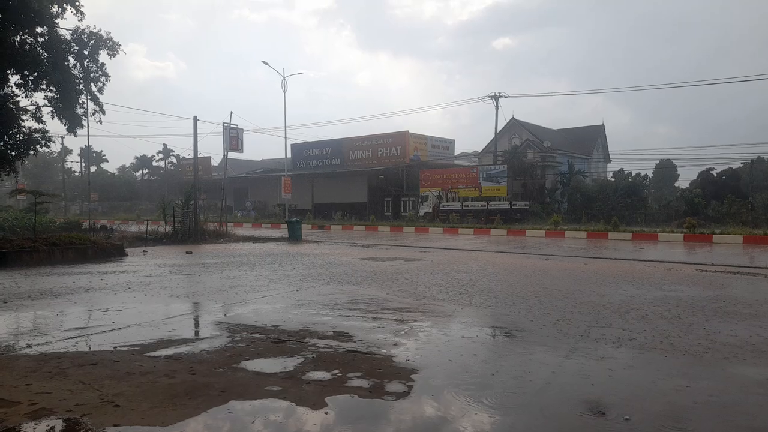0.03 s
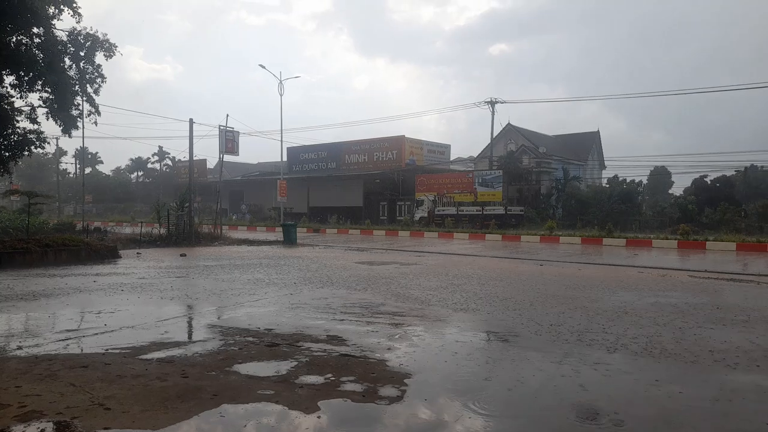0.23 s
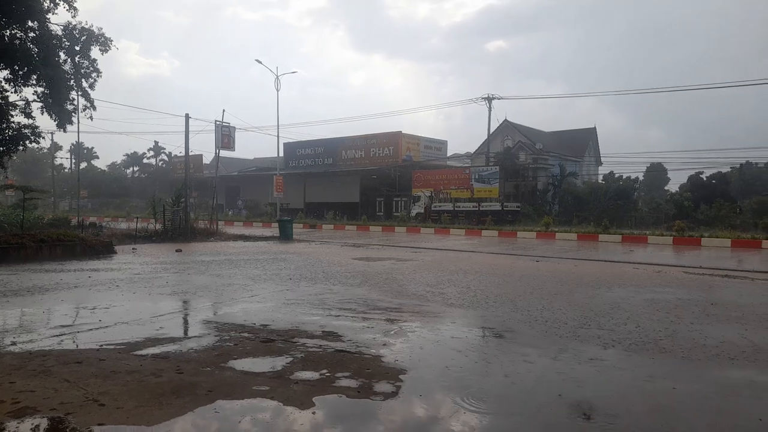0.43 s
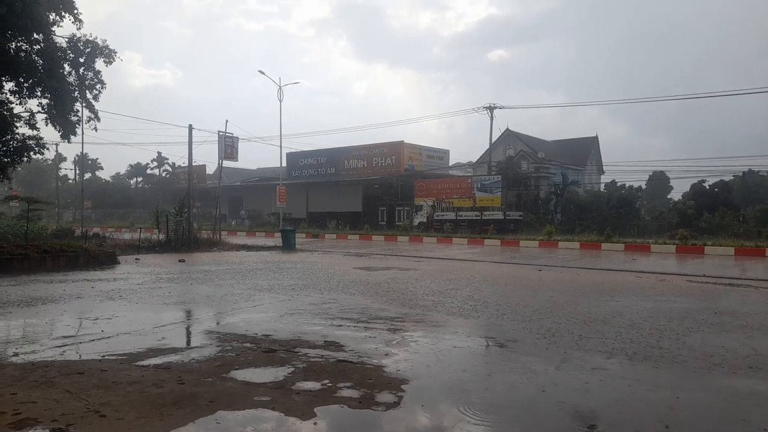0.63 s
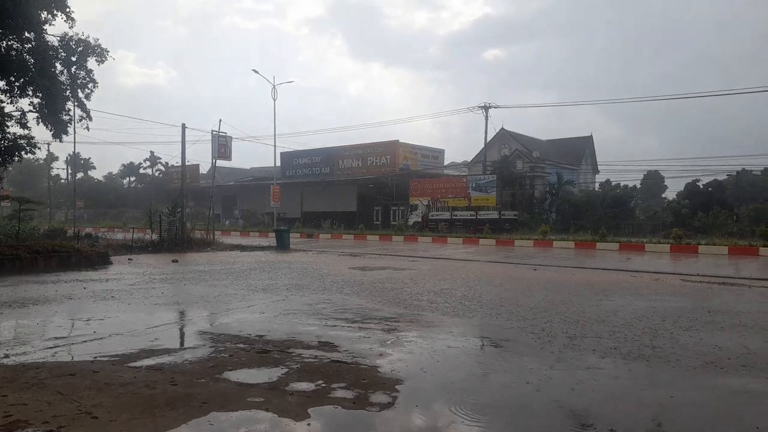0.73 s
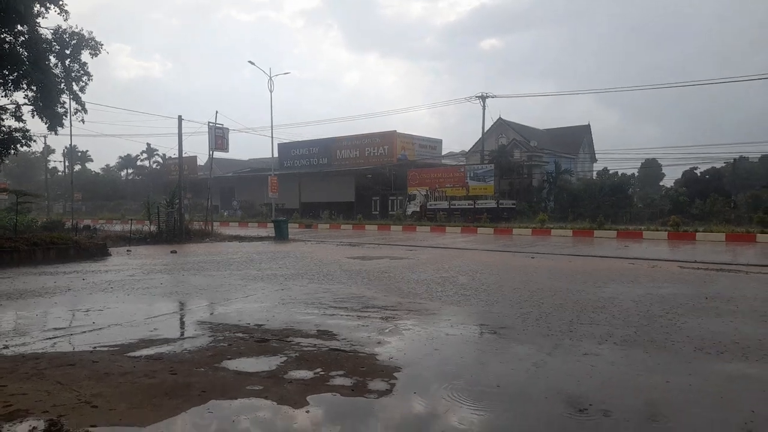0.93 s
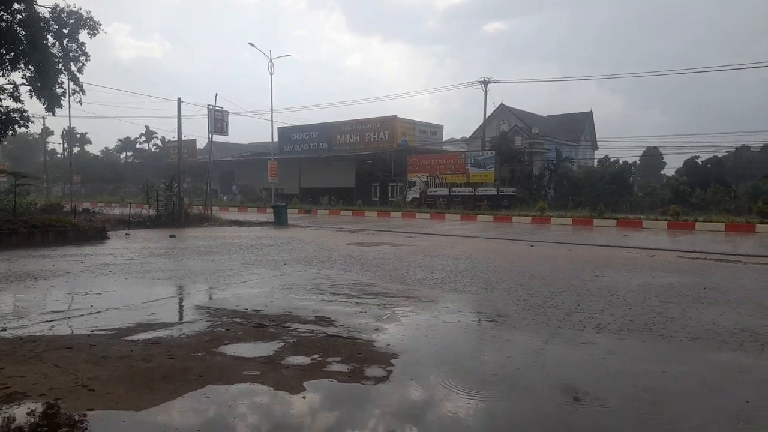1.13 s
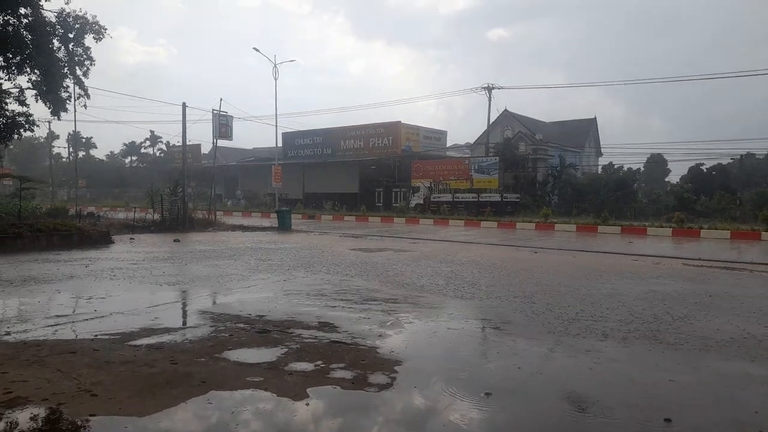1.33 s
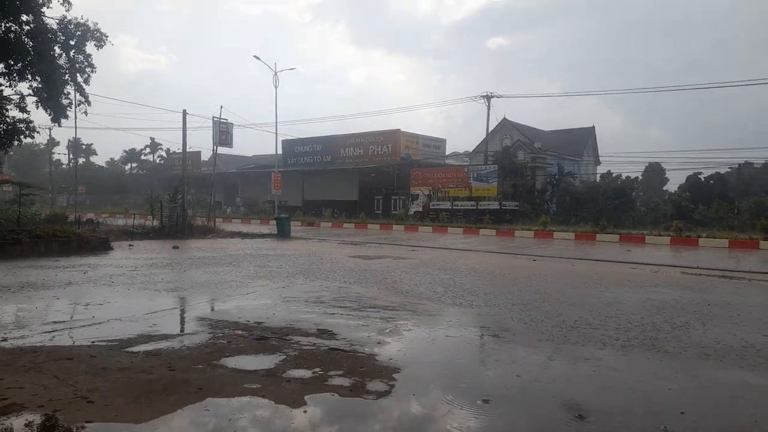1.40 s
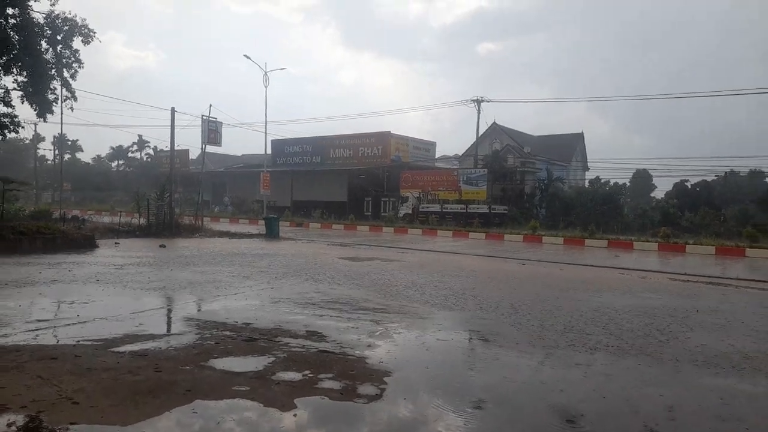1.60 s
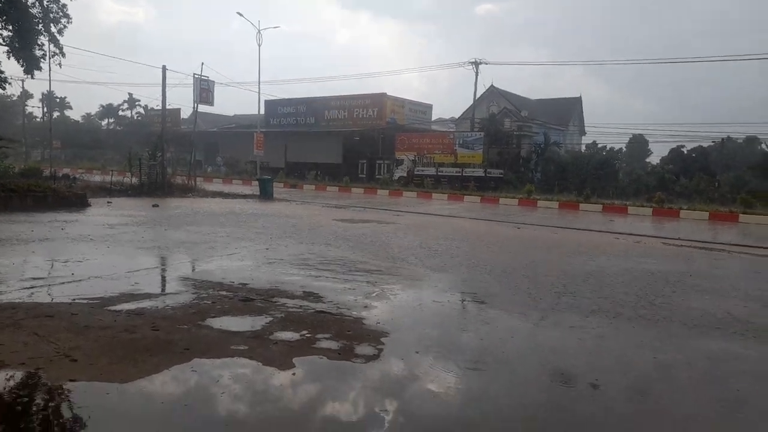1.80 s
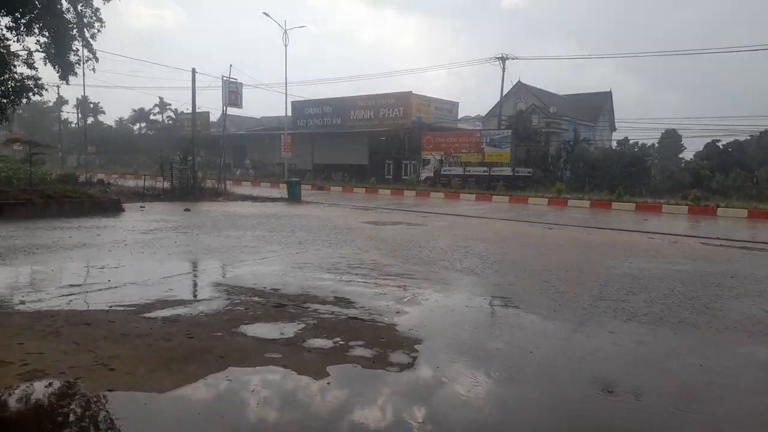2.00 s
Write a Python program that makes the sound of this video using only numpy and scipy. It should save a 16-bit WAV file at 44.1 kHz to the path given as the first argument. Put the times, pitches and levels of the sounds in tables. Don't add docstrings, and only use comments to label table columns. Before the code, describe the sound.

Heavy rain on a flooded road cuts in at full strength after about 0.07 s of silence and stays even to the end near 2 s: dense, wide hiss over low drumming. Wind thumps flutter mainly left at 0.13-0.26, 0.55-0.76 and sparsely after 1.7 s. Tiny near drops tick, clearest on the right at 0.28 s. The handheld microphone's right side dulls slightly around 0.3-0.9 s, brightens, then dulls markedly after 1.9 s.

```python
import sys
import numpy as np
from scipy import signal
from scipy.fft import rfft, irfft
from scipy.io import wavfile
from scipy.ndimage import uniform_filter1d

SR = 44100
rng = np.random.default_rng(int(sys.argv[2]) if len(sys.argv) > 2 else 0)


def materialize(psi):
    bounded = np.clip(np.atleast_2d(psi).T, -1, 1)
    quanta = np.round(bounded * 32767).astype(np.int16)
    wavfile.write(sys.argv[1], SR, quanta)


def voltage_ratio(decibels):
    exponent = np.asarray(decibels, float) / 20
    return 10 ** exponent


N = 90449

# time_s, level_db
DOWNPOUR = [(0, 3), (.15, 0.5), (.4, 0), (.65, .5), (.9, -.5), (1.15, -0.5), (1.35, .5), (1.6, 0),
            (1.85, -.5), (2.05, 0)]
# pitch_hz, density_db (per Hz)
DRUM_COLOUR = [(35, -11.5), (100, -1.5), (250, 1), (430, -7.5), (620, -3.5), (760, -1), (1050, -9),
               (2200, -28.5)]
# pitch_hz, likeness (0-1)
DRUM_LIKENESS = [(60, 0.3), (200, 1), (400, 0.89), (750, 0.32), (1300, 0.055)]
# pitch_hz, density_db (per Hz)
HISS_LEFT = [(500, -12.5), (1200, 0.5), (2500, -2.5), (4500, -4.5), (6500, -8.5), (9300, -7), (11500, -8),
             (15700, -11)]
# pitch_hz, density_db (per Hz)
HISS_RIGHT = [(500, -6), (1200, 0), (3700, -1), (4800, -2), (7300, -3.5), (8500, -7.5), (11500, -9),
              (15700, -11.5)]
# time_s, treble_db
FACING = [
    (0, 0),
    (.3, -3),
    (.6, -3.5),
    (.9, -3),
    (1.2, -1.5),
    (1.5, -0.5),
    (1.8, -1),
    (1.9, -4),
    (2.05, -11),
]
# pitch_hz, width (natural-log units), left_db, right_db
CAVITIES = [(9300, .05, -1.5, 0.5), (9970, 0.031, -1, 5.5), (13800, 0.091, 3.5, 1.5),
            (2540, 0.017, 3.5, -0.5)]
# centre_s, length_s, level_db (rms), pitch_hz
GUSTS_LEFT = [(.131, 0.016, -20.5, 226), (.138, 0.018, -21, 90), (.165, 0.017, -15.5, 164),
              (.192, 0.024, -13.5, 153), (.208, 0.011, -20, 202), (.256, 0.035, -24.5, 148),
              (.547, 0.034, -28.5, 140), (.568, 0.026, -22, 150), (.587, 0.014, -23, 323),
              (.606, 0.023, -17.5, 146), (.638, 0.027, -19, 156), (.662, 0.032, -19.5, 117),
              (.68, 0.011, -16, 197), (.695, 0.034, -20, 132), (.722, 0.045, -24, 113),
              (.752, 0.011, -19, 190), (.763, 0.019, -26, 91), (1.025, 0.035, -24.5, 146.6),
              (1.70, 0.024, -25.5, 228), (1.785, 0.016, -18.5, 117), (1.801, .018, -21, 130),
              (1.887, 0.019, -20, 237), (1.961, 0.0088, -21, 184), (1.971, 0.021, -25, 110),
              (2.033, 0.021, -21.5, 131)]
# centre_s, length_s, level_db (rms), pitch_hz
GUSTS_RIGHT = [
    (.30, 0.018, -28, 110),
    (.675, 0.023, -28, 108),
    (.718, 0.02, -23.5, 214),
    (1.885, 0.0083, -17.5, 178),
    (1.927, .025, -25, 96),
    (2.04, 0.036, -30, 99),
]
# time_s, left_db, right_db, pitch_hz
NEAR_DROPS = [(.1456, -21, -30, 12650), (.2705, -28, -20, 4000), (.2745, -28, -19, 3600),
              (.2764, -21, -11, 6960), (.2797, -27, -20, 4170), (.282, -28, -21, 6000),
              (.4236, -24, -36, 12650), (.533, -24, -28, 8250), (.6027, -27, -22, 9800),
              (.6091, -28, -22, 13800), (.6843, -24, -32, 10660), (.7066, -24, -21, 5400),
              (.8667, -27, -23, 13800), (1.0035, -26, -22, 7500), (1.0331, -20, -20, 12650),
              (1.1627, -27, -22, 13800), (1.1657, -29, -21, 8250), (1.1688, -30, -21, 6960),
              (1.264, -33, -26, 15000), (1.279, -32, -21, 7600), (1.3509, -36, -23, 10660),
              (1.3618, -33, -25, 15000), (1.3721, -36, -22, 9800), (1.4226, -30, -23, 13800),
              (1.5213, -32, -22, 7600), (1.5965, -30, -23, 10660), (1.6318, -34, -23, 11600),
              (1.72, -36, -23, 10660), (1.7325, -36, -22, 9800)]


def evened(x):
    return x / np.sqrt(np.mean(x ** 2, -1, keepdims=True) + 1e-20)


def read(points, hz):
    f, value = np.transpose(points)
    return np.interp(np.log(hz + 1), np.log(f + 1), value)


def bell(hz, centre_hz, width):
    return np.exp(-0.5 * (np.log((hz + 1) / centre_hz) / width) ** 2)


def band(x, centre_hz, width):
    f = np.fft.rfftfreq(len(x), 1 / SR)
    return irfft(rfft(x) * bell(f, centre_hz, width), len(x))


def add(mix, centre_s, sound):
    at = round(centre_s * SR) - sound.shape[-1] // 2
    part = mix[..., at:at + sound.shape[-1]]
    part += sound[..., :part.shape[-1]]


def noise_pair(likeness, size, patchy_db, flicker_db, lead_s=0):
    frames, hz = 4 * N // size + 5, np.fft.rfftfreq(size, 1 / SR)
    a, b, c, d, p, q = rng.standard_normal((frames, len(hz), 6)).T
    patches = []
    for v in (p, q):
        over_pitch = uniform_filter1d(v, size=8, axis=0)
        patches.append(evened(uniform_filter1d(over_pitch, size=14, axis=1)))
    flicker = evened(uniform_filter1d(p, size=len(hz) // 2, axis=0))
    same = likeness(hz)[:, None]
    shared, own = a + 1j * b, c + 1j * d
    left = shared * np.exp(2j * np.pi * hz * lead_s)[:, None]
    right = same * shared + np.sqrt(1 - same ** 2) * own
    gain = voltage_ratio(patchy_db * np.array(patches) + flicker_db * flicker)
    return np.array([left, right]) * gain, hz


def drumming():
    z, hz = noise_pair(lambda f: read(DRUM_LIKENESS, f), size=1024, patchy_db=1.57, flicker_db=-1.07)
    z = z * voltage_ratio(read(DRUM_COLOUR, hz))[:, None]
    return voltage_ratio(-29) * evened(signal.istft(z, nperseg=1024, noverlap=768)[1][:, :N])


def drops():
    drops_per_s, spread_db, ring_cycles, pitches = 2500, 2, 4, 24
    out = np.zeros((2, N))
    for hz in np.geomspace(900, 16000, num=pitches):
        t = np.arange(int(3 * ring_cycles / hz * SR) + 8) / SR
        envelope = (1 - np.exp(-t * hz * 1.5)) * np.exp(-t * hz * 2.17 / ring_cycles)
        splash = envelope * np.sin(2 * np.pi * hz * t * (1 + 0.057 * hz * t))
        lands = rng.random((2, N)) < drops_per_s / pitches / SR
        size = voltage_ratio(spread_db * np.minimum(rng.exponential(1, (2, N)), 5)) * lands
        splash = np.sqrt(hz) * evened(splash) / np.sqrt(len(t))
        out += signal.oaconvolve(size, splash[None], axes=1)[:, :N]
    return evened(out)


def hiss():
    z, hz = noise_pair(lambda f: np.full(len(f), 0.18), size=256, patchy_db=1.5, flicker_db=0.76,
                       lead_s=0.000457)
    wash = evened(signal.istft(z, nperseg=256, noverlap=192)[1][:, :N])
    drop_share = 0.24
    flat = np.sqrt(1 - drop_share) * wash + np.sqrt(drop_share) * drops()
    hz, t, z = signal.stft(flat, SR, nperseg=512)
    reach = np.clip(np.log((hz + 1) / 2860) / np.log(9000 / 2860), 0, 1)
    z[1] *= voltage_ratio(np.outer(reach, np.interp(t, *np.transpose(FACING))))
    z *= voltage_ratio(np.array([read(HISS_LEFT, hz), read(HISS_RIGHT, hz)]))[:, :, None]
    for peak_hz, width, left_db, right_db in CAVITIES:
        z *= voltage_ratio(np.outer([left_db, right_db], bell(hz, peak_hz, width)))[:, :, None]
    level_db = np.array([[-28.5], [-25.5]])
    return voltage_ratio(level_db) * evened(signal.istft(z, SR, nperseg=512)[1][:, :N])


def wind(gusts):
    swing_share = 0.62
    out, t = np.zeros(N), np.arange(-4096, 4096) / SR
    for centre_s, length_s, level_db, hz in gusts:
        a, b, c = rng.standard_normal((len(t), 3)).T
        swing = np.sqrt(2) * np.sin(2 * np.pi * hz * t + 3 * a[0])
        turbulence = evened(band(a, hz, 0.47))
        body = swing_share * swing + (1 - swing_share) * turbulence
        thud, flap = band(b, 59, 0.32), band(c, 310, 0.26)
        # sound, stretch of the length, level_db
        for v, stretch, part_db in ((body, 1, 0), (thud, 2.06, -9.5), (flap, 0.7, -10)):
            shape = np.exp(-0.5 * (1.85 * t / (length_s * stretch)) ** 2)
            even = np.sqrt(np.sum(shape ** 2) / np.sum((shape * v) ** 2))
            add(out, centre_s, voltage_ratio(level_db + part_db) * shape * v * even)
    return out


def near_drops():
    ring_s, spray_s, snap_db, spray_db, rise = 0.00014, 0.008, 3, -15, 0.03
    out, t = np.zeros((2, N)), np.arange(-1024, 1024) / SR
    for time_s, left_db, right_db, hz in NEAR_DROPS:
        u = np.maximum(t / ring_s + 1, 0)
        rising = 1 + rise * np.clip(t / ring_s, -1, 3)
        snap = u * np.exp(1 - u) * np.sin(2 * np.pi * hz * t * rising)
        spray = np.array([evened(band(v, hz, 0.2)) for v in rng.standard_normal((2, len(t)))])
        spray = voltage_ratio(spray_db) * spray * np.exp(-abs(t) / spray_s) * (t > 0)
        add(out, time_s, voltage_ratio(snap_db + np.array([[left_db], [right_db]])) * (snap + spray))
    return out


def scene():
    swell_db = np.interp(np.arange(N) / SR, *np.transpose(DOWNPOUR))
    rain = voltage_ratio(1.85 * swell_db) * drumming() + voltage_ratio(swell_db) * hiss()
    buffets = np.array([wind(GUSTS_LEFT), wind(GUSTS_RIGHT)])
    return rain + buffets + near_drops()


def band_limit(x):
    return signal.sosfilt(signal.butter(12, 15760, fs=SR, output="sos"), x)


def record(dry):
    start_s, opening_s = 0.0692, 0.00033
    bass_cut = signal.butter(2, 45, "highpass", fs=SR, output="sos")
    cut = signal.sosfilt(bass_cut, dry)
    opened = cut * np.clip((np.arange(N) / SR - start_s) / opening_s, 0, 1)
    treble_edge = signal.firwin(701, 15910, window=("kaiser", 9), fs=SR)
    mix = signal.oaconvolve(opened, treble_edge[None], "same", axes=1)
    return band_limit(mix)


dry = scene()
out = record(dry)
materialize(out)
```